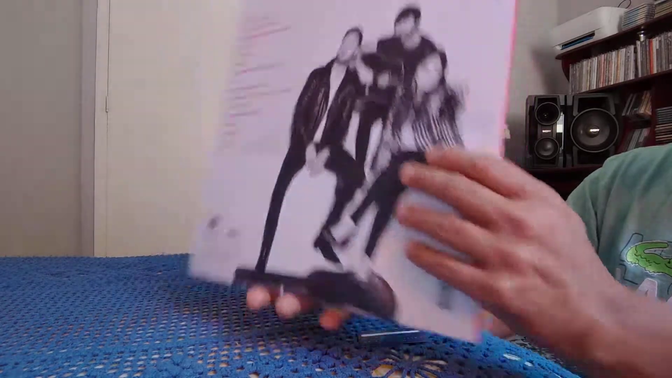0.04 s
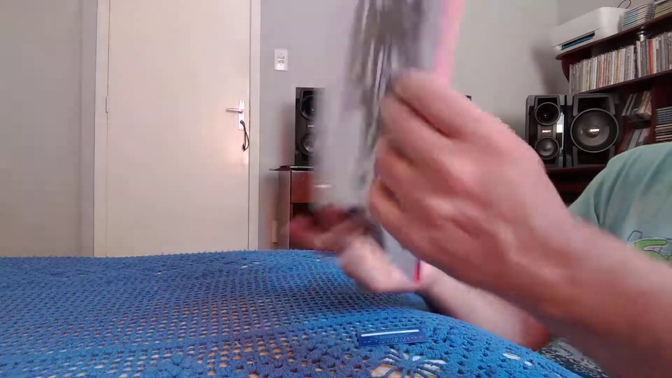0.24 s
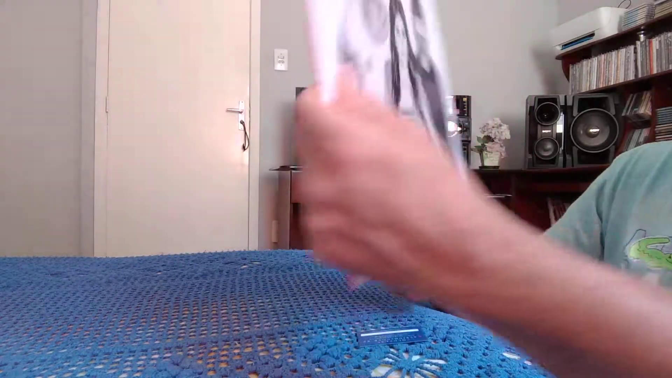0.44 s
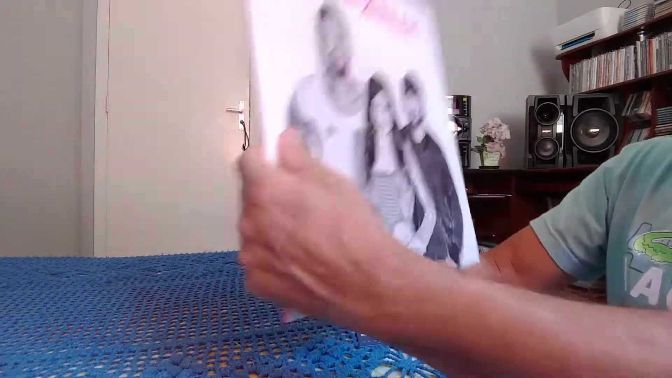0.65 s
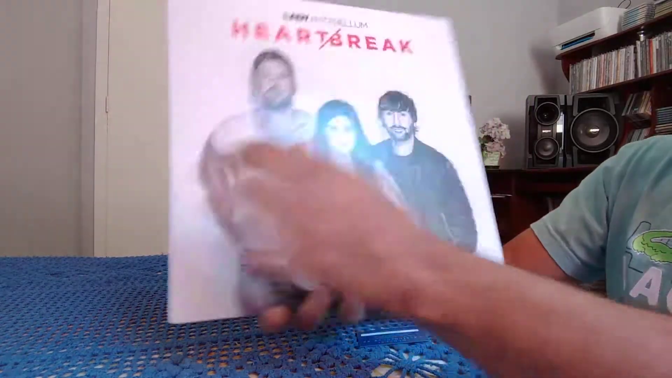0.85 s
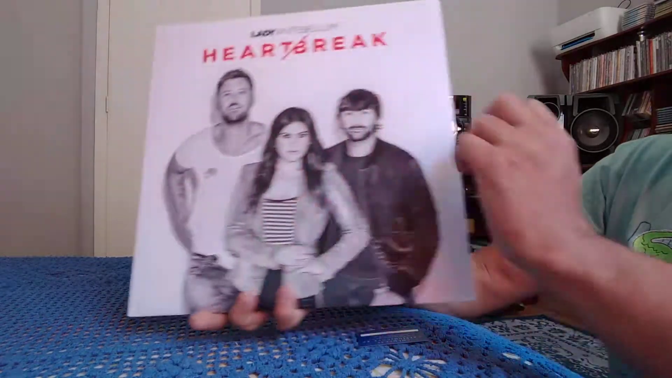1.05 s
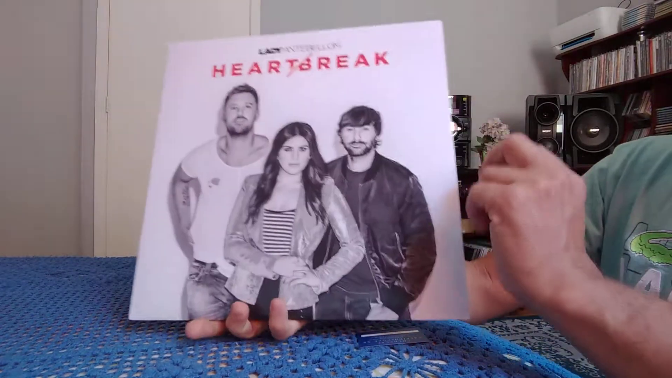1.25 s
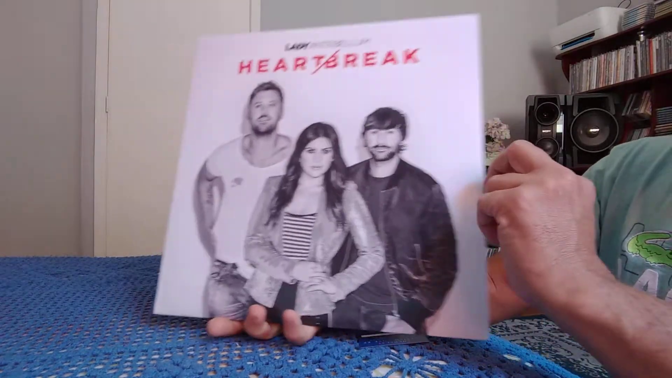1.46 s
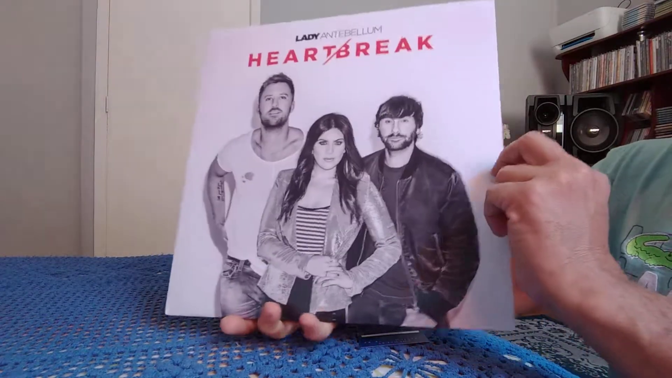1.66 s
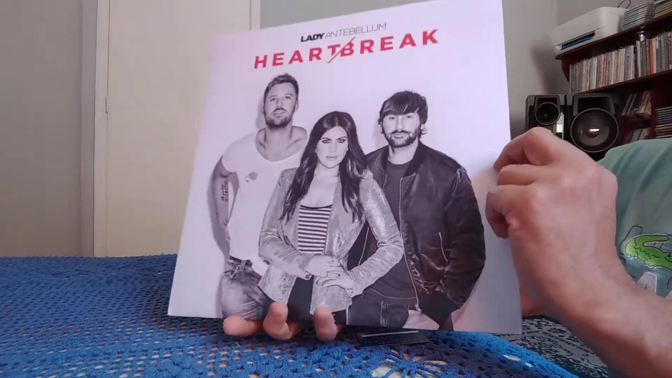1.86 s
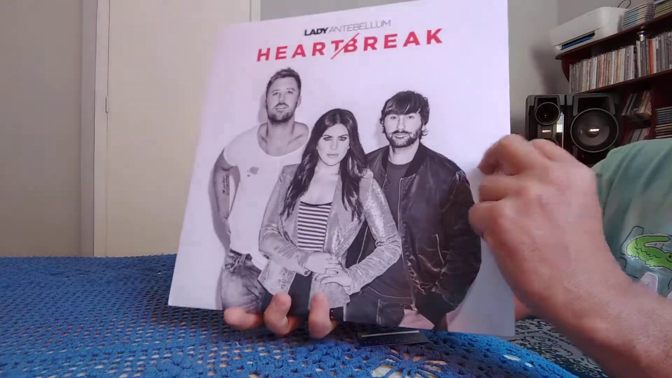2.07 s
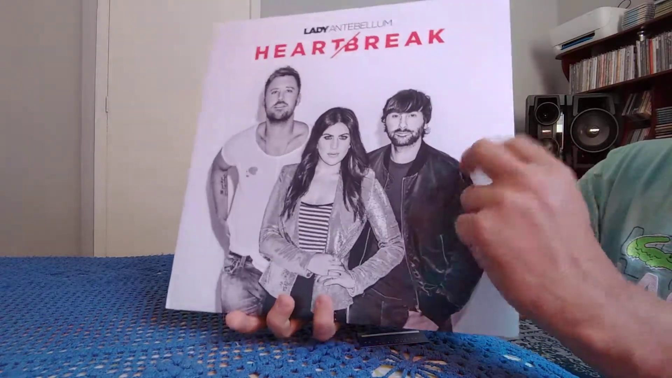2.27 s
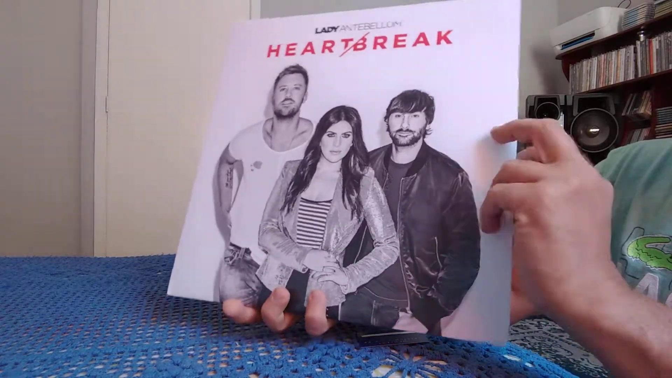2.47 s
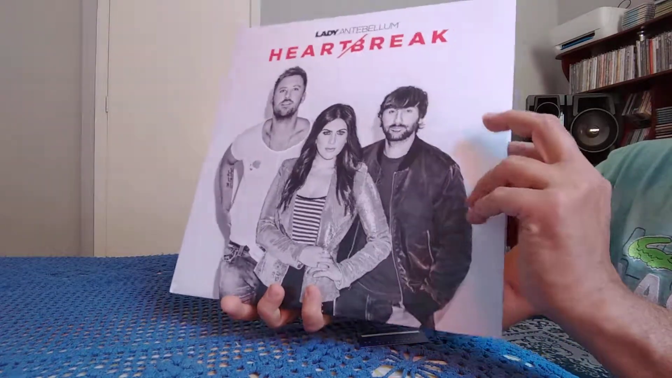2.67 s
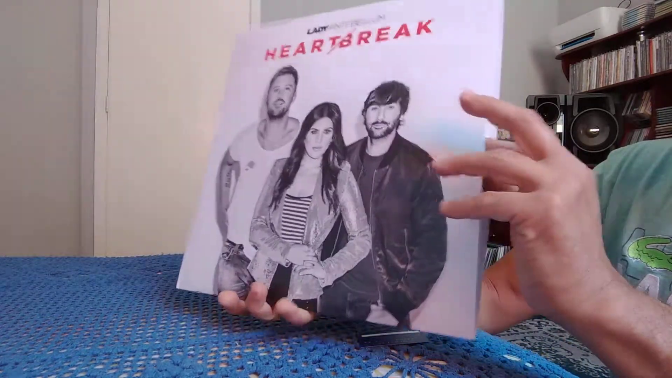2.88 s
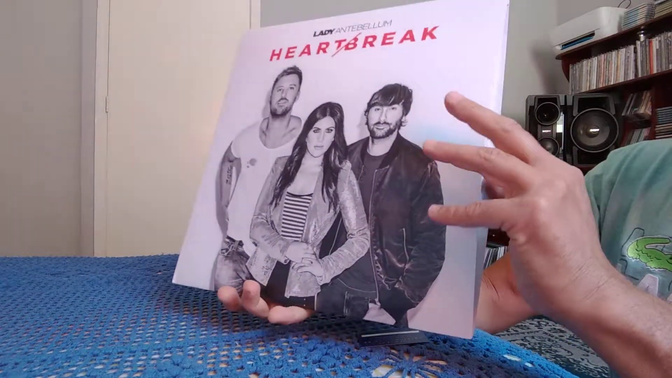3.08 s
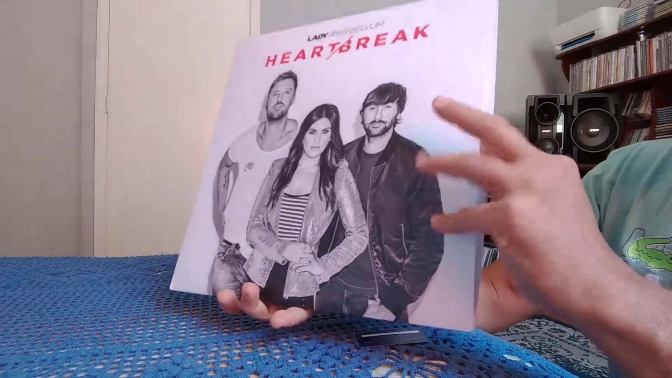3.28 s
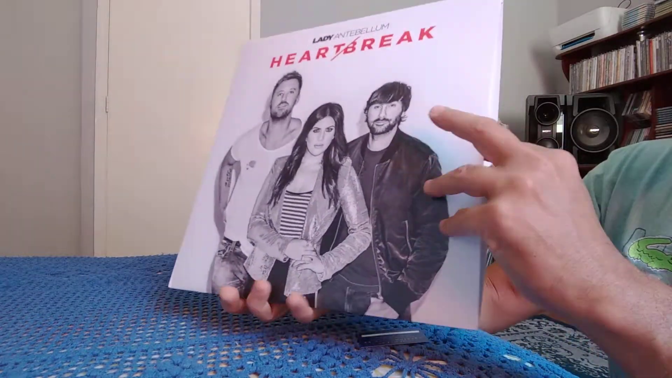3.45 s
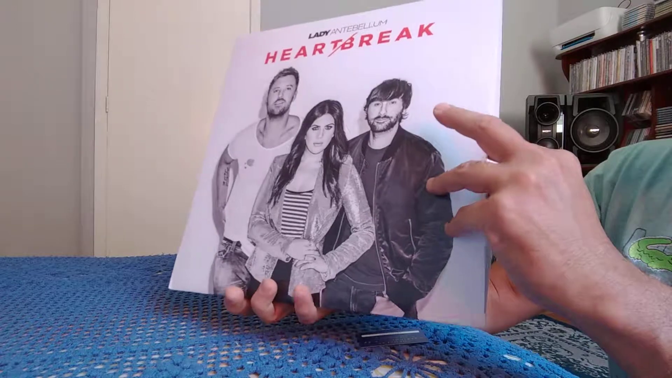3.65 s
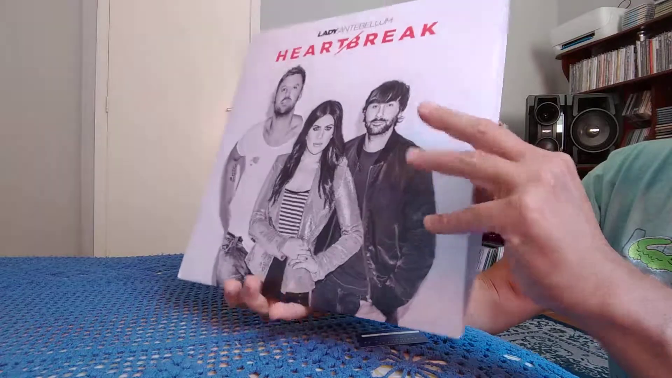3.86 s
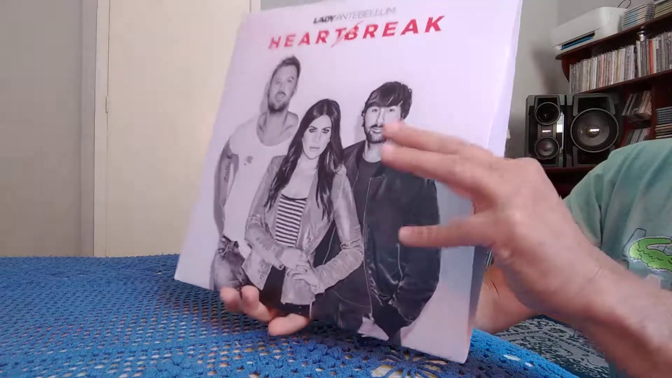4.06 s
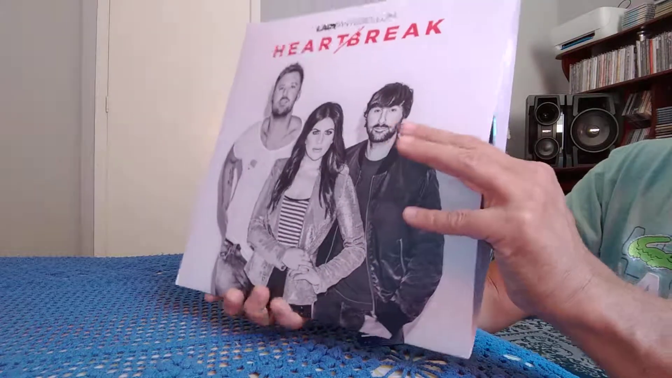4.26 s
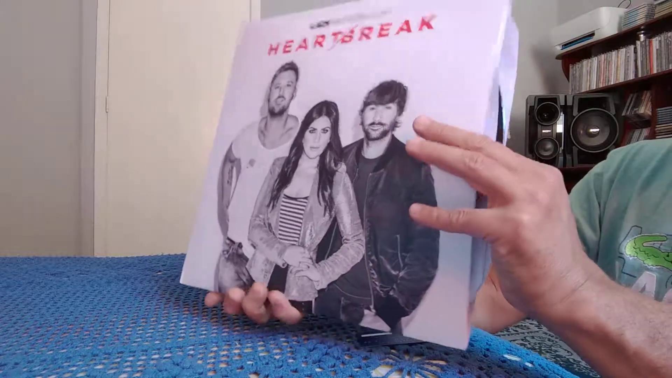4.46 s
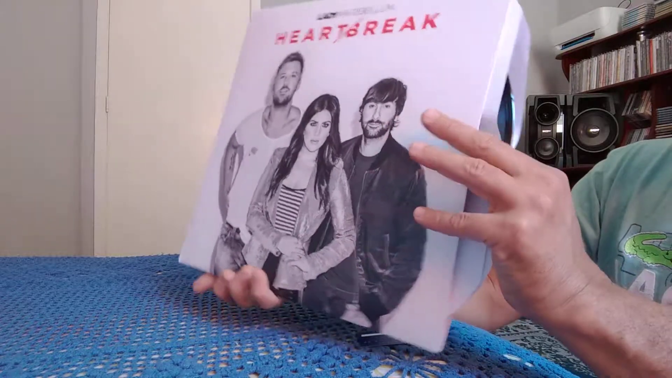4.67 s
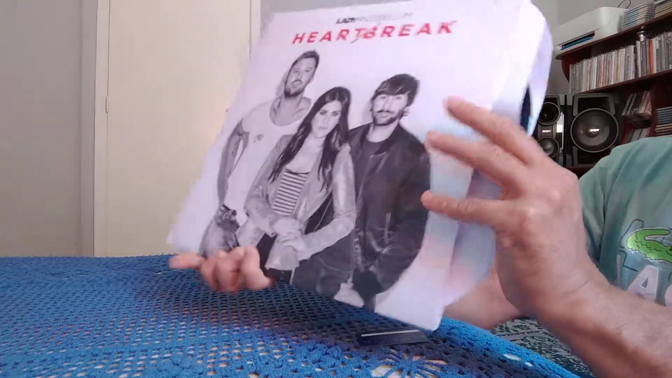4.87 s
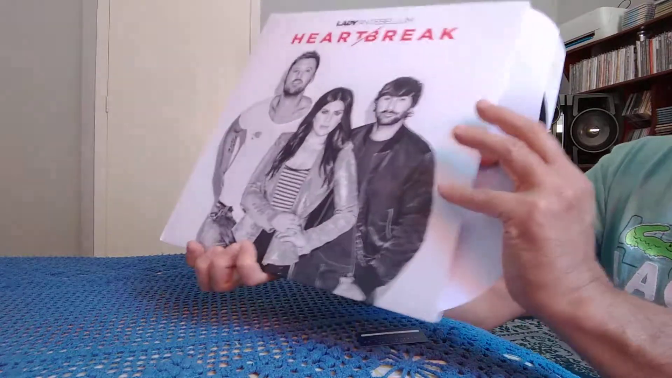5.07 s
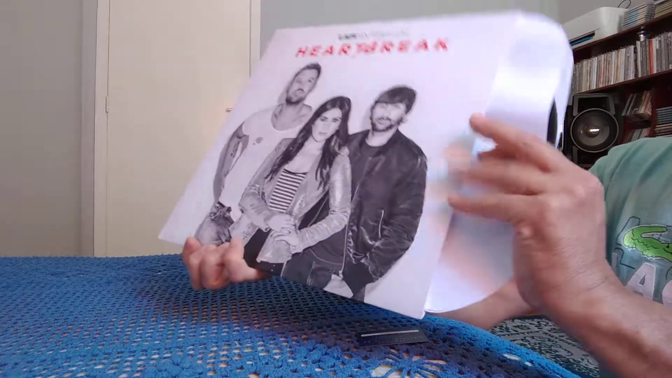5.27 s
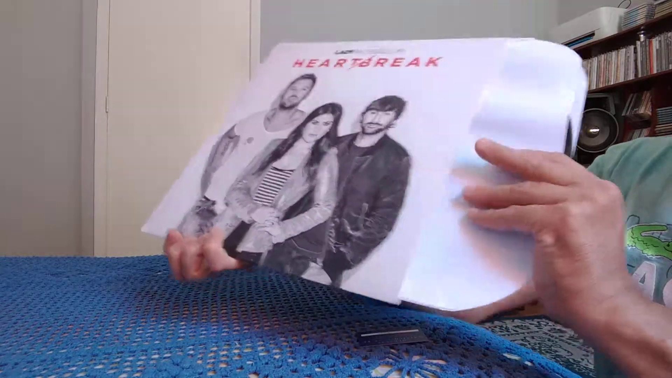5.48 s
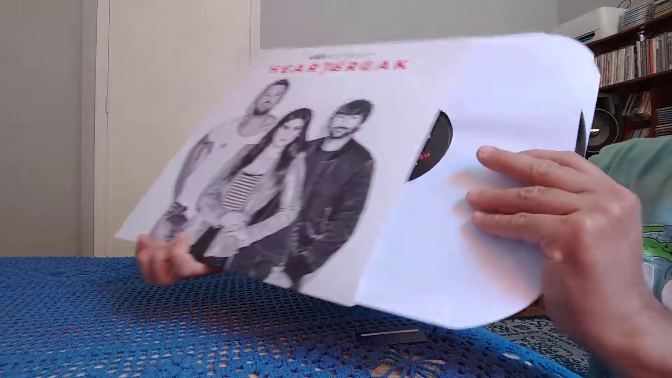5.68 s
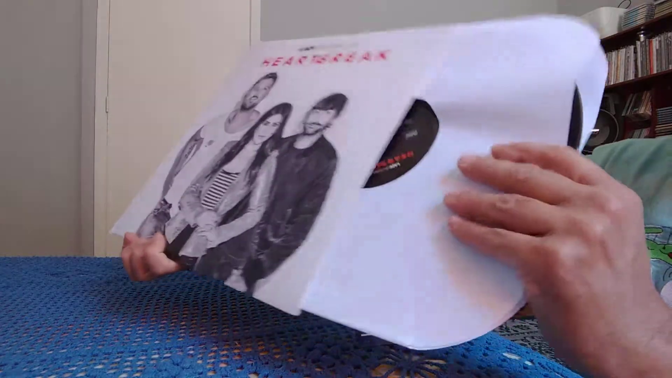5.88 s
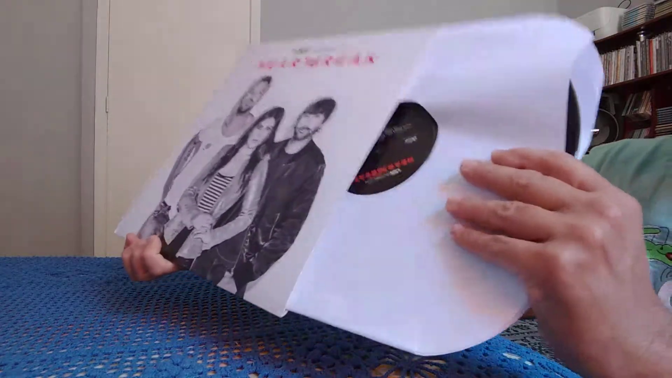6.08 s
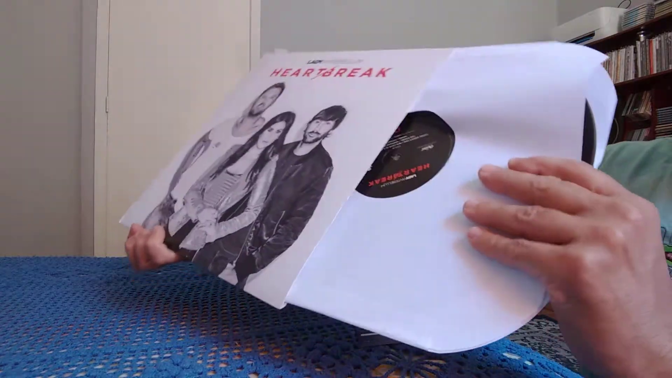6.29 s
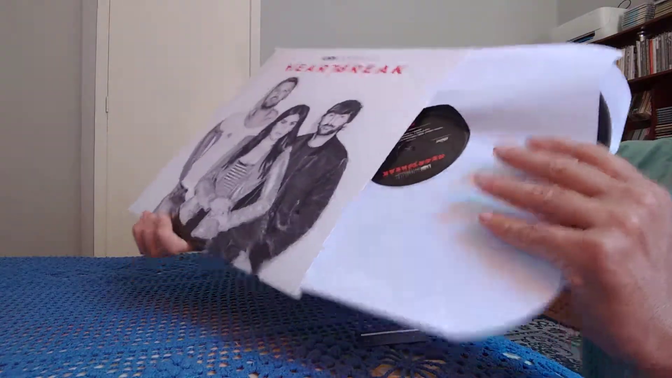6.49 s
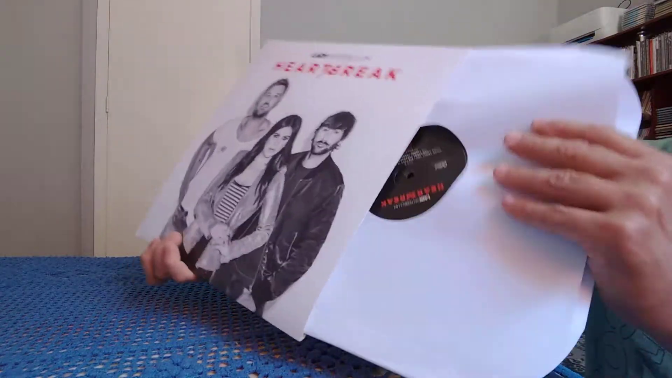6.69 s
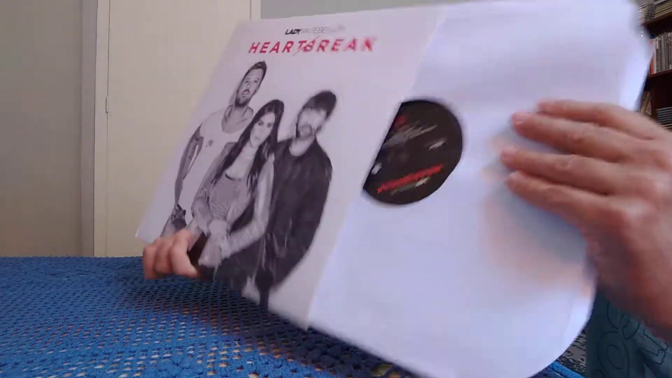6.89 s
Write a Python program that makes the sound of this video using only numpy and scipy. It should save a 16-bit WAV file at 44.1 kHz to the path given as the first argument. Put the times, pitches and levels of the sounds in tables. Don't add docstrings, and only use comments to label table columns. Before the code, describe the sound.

Close, dry handling of stiff card in a quiet room, light taps giving way to louder, sticking slides of crisp paper.

```python
import sys
import numpy as np
from scipy import signal
from scipy.fft import rfft, irfft, next_fast_len
from scipy.io import wavfile
from scipy.ndimage import uniform_filter1d

SR = 44100
rng = np.random.default_rng(int(sys.argv[2]) if len(sys.argv) > 2 else 0)


def store_wav(level_fs):
    pcm = np.round(np.clip(np.atleast_2d(level_fs), -1, 1) * 32767)
    wavfile.write(sys.argv[1], SR, pcm.T.astype(np.int16))


def field_ratio(decibels):
    return 10 ** (np.asarray(decibels, dtype=float) / 20)


N = 305613
HZ = np.fft.rfftfreq(2 * next_fast_len(N // 2 + 4096, True), 1 / SR)

# frequency_hz, level_db
AIR_COLOUR = [(30, 12.5), (50, -2), (80, -4.5), (150, 0.5), (300, -5), (700, -18), (1500, -31.5),
              (3000, -23), (5000, -22.5), (9000, -25.5), (12500, -27.5), (14500, -29)]
AIR_DB = -52
# pitch_hz, width_hz, level_db
DRONES = [
    (49.6, 11, -60),
    (148.75, 3.5, -59.5),
    (171, 2.9, -68),
]
UPPER_DRONES_DROP_S, DRONE_FADE_S = 4.5, 0.1
DRONE_STEADINESS = 0.7

# start_s, sliding_speed_db, grip_pressure_db, lean_to_left_db
HANDS = [(0, -51.5, -66, 0), (.28, -57, -61, 1), (.33, -70.5, -59.5, 0.5), (.5, -62.5, -60.5, 0.5),
         (.83, -58.5, -58.5, 0.5), (1.26, -68.5, -61.5, 1.5), (1.618, -69, -61, 1.5),
         (2.4, -70, -58.5, 0.5), (3.05, -68, -58.5, -2), (3.3, -66.5, -56.5, -1.5), (3.62, -79, -63, -1.5),
         (3.72, -60, -54.5, -1.5), (4.08, -64.5, -52.5, -1), (5.27, -77.5, -54.5, -1),
         (6.232, -49.5, -55, 0), (6.378, -78, -61.5, 0.5), (6.46, -50.5, -61, 1), (6.93, -54, -52.5, -1)]
EDGE_FROM_SPEED = 0.37
EDGE_DB, THUD_DB = -6.5, -4.5
# peak_s, fade_s, paper_db, edge_db, board_db
BRUSHES = [(.1, 0.044, -52, -60, -72), (.19, 0.086, -58, -60.5, -63), (.395, 0.025, -66, -84, -59),
           (.6, 0.14, -51, -58.5, -67), (0.689, 0.058, -46, -70, -55), (.81, 0.019, -54, -70, -70),
           (1.295, 0.02, -60, -67, -75), (1.42, 0.15, -63, -74, -63), (1.54, 0.034, -77, -67, -72),
           (1.687, 0.044, -48.5, -72, -69), (1.76, 0.055, -54, -66, -75), (1.94, 0.044, -52, -54, -71),
           (2.019, 0.093, -62, -61, -73), (2.11, 0.072, -57, -56, -66), (2.52, 0.23, -68, -62, -55.5),
           (2.826, 0.034, -66, -66, -47.5), (2.899, 0.098, -51.5, -65, -52), (3.13, 0.21, -71, -65, -73),
           (3.4, 0.066, -61, -70, -57), (3.572, 0.035, -60, -64, -52)]
BRUSH_RISE = 0.49
# peak_s, thud_db, board_db
NUDGES = [(.17, -52, -76), (.48, -49, -68), (.6, -46.5, -63), (1.42, -59, -80), (2.02, -72, -82),
          (2.09, -56, -69), (2.52, -52, -69), (3.13, -53.5, -74), (3.24, -58, -71), (3.4, -53, -64),
          (3.71, -69, -73), (3.842, -50, -53), (3.942, -47, -54), (4.05, -49, -82), (4.774, -51, -49),
          (4.99, -45, -49), (5.07, -49, -45.5), (5.25, -52, -52), (5.79, -54, -44), (6.156, -70, -61),
          (6.231, -67, -46.5), (6.34, -60, -66), (5.16, -58, -53), (6.55, -54, -50), (6.452, -49, -70),
          (6.62, -50, -46), (6.68, -47.5, -60), (6.8, -53, -52), (6.878, -55, -47.5)]
NUDGE_RISE_S, NUDGE_FADE_S = 0.036, 0.08
# peak_s, rise_s, fade_s, paper_db, edge_db
DRAWS = [(3.942, 0.067, 0.078, -45.5, -50.5), (4.138, 0.038, 0.24, -59.5, -57),
         (4.44, 0.18, 0.19, -54, -54.5), (4.56, 0.047, 1, -54, -57.5), (5.13, 0.088, 0.16, -50, -50),
         (5.341, 0.032, 0.52, -32.5, -40), (5.7, 0.24, 0.088, -66, -66), (5.884, 0.064, 0.18, -36.5, -44),
         (6.05, 0.017, 0.11, -43, -54), (6.198, 0.13, 0.082, -40.5, -45), (6.522, 0.048, 0.17, -54, -44.5),
         (6.595, 0.092, 0.052, -32.5, -55), (6.674, 0.031, 0.11, -50, -39),
         (6.72, 0.046, 0.029, -38.5, -58), (6.851, 0.022, 0.19, -32.5, -41.5),
         (6.875, .025, 0.07, -32, -60), (6.915, 0.016, .1, -29, -60)]
STOP = 0.62
# start_s, length_s, board_db, edge_db, paper_db
SLIPS = [(3.867, 0.044, -45.5, -38, -61), (3.936, 0.073, -55, -62, -49), (4.211, 0.033, -54, -49, -47.5),
         (4.288, 0.049, -56, -49.5, -51), (4.391, 0.079, -54, -45.5, -42), (4.528, 0.056, -59.5, -49, -47),
         (4.644, 0.03, -56, -45, -40.5), (4.671, .058, -51, -43.5, -35.5), (4.772, 0.037, -70, -52, -44),
         (4.918, 0.029, -51.5, -55, -38.5), (4.946, 0.025, -49.5, -48, -39.5),
         (5.008, 0.15, -56.5, -41, -33.5), (5.176, 0.038, -54.5, -50, -41.5),
         (5.283, 0.053, -60, -45.5, -36.5), (5.349, 0.03, -54, -51, -26), (5.418, 0.08, -63, -53, -28.5),
         (5.762, 0.023, -68, -44.5, -28.5), (6.433, 0.023, -71, -60, -45), (5.145, 0.026, -64, -53, -42),
         (6.482, 0.034, -67, -50, -38)]
PULL_S = 3.65

# start_s, board_db, edge_db, paper_db, t60_s
SCUFFS = [(0.099, -62, -56, -45, 0.1), (0.27, -70, -70, -47, 0.23), (0.688, -69, -68, -55, 0.072),
          (1.069, -65, -53.5, -54, 0.11), (1.673, -73, -54, -44, 0.12), (1.754, -68, -61, -49.5, 0.45),
          (1.913, -74, -58, -35, 0.094), (1.924, -59, -37.5, -28, 0.077), (2.11, -51, -41, -56, 0.041),
          (2.892, -66, -65, -34.5, 0.048), (3.141, -50.5, -53, -51, 0.14), (3.668, -43.5, -48, -50, 0.038),
          (3.728, -50.5, -60, -39, 0.14), (3.821, -44.5, -47, -50, 0.1), (3.909, -39, -41, -26, 0.079),
          (5.034, -45.5, -34.5, -28.5, 0.15), (6.481, -58, -62, -53, 0.13), (6.678, -47, -42, -49, 0.15)]
# start_s, board_knock_db, edge_crack_db, paper_tick_db, t60_s
SNAPS = [(0.38, -63, -52, -53, 0.028), (0.476, -71, -53, -57, 0.036), (1.274, -66, -60, -46, 0.008),
         (1.911, -53.5, -49, -37, 0.036), (2.012, -50, -38.5, -41, 0.019),
         (3.135, -39.5, -37.5, -67, 0.024), (3.562, -60, -61, -59, 0.013), (3.7168, -56, -52, -38.5, 0.011),
         (3.8172, -39.5, -43, -55, 0.018), (3.914, -41, -32, -40, 0.013), (4.711, -45, -48, -35, 0.0099),
         (5.754, -45, -36, -35.5, 0.0097), (6.629, -42, -32.5, -51, 0.028), (6.655, -42, -42, -53, 0.022),
         (6.666, -38.5, -46, -26, 0.027), (6.6755, -38.5, -27, -44, 0.022),
         (6.7635, -32.5, -25.5, -59, 0.0073), (1.278, -75, -75, -51, .012), (4.676, -50, -44, -50, 0.018),
         (3.65, -55.5, -55.5, -64, 0.03), (6.779, -45, -52, -58, 0.014), (6.687, -43, -44, -54, 0.016),
         (5.176, -42.5, -52, -54, 0.011), (5.7755, -54, -48, -39, .007), (5.785, -49, -46, -42, 0.0072),
         (5.809, -54, -33, -47, .01), (6.225, -47.5, -48, -52, 0.015), (6.608, -41, -48, -55, 0.021),
         (6.702, -51, -52, -52, 0.014), (3.8745, -43, -43, -53, 0.0095), (2.117, -47, -49, -58, .012),
         (6.122, -46, -53, -52, 0.0093)]
# start_s, length_s, pitch_hz, level_db
SQUEAKS = [
    (1.482, 0.22, 3060, -68),
    (2.376, 0.54, 3150, -72),
]
SQUEAK_WIDTH_HZ = 63
# start_s, peak_db, pitch_hz, t60_s
RINGS = [(2.615, -33, 1195, 0.039), (3.136, -23.5, 860, 0.03), (3.1354, -30, 440, 0.03),
         (3.136, -26, 1193, 0.026), (3.1362, -28, 1000, 0.038), (3.138, -34, 210, 0.052),
         (3.199, -32, 97, 0.13), (3.136, -24, 1680, 0.032), (3.818, -23.5, 735, 0.018),
         (4.294, -37.5, 870, 0.1), (4.712, -17.5, 1435, 0.015), (4.772, -34, 495, 0.055),
         (5.057, -28, 1580, 0.047), (5.755, -30, 102, 0.21), (6.225, -30.5, 1190, 0.033),
         (6.514, -36, 897, 0.066), (6.673, -23, 1640, 0.022)]

# frequency_hz, level_db
SKIN_COLOUR = [(1500, -14), (3500, -11), (5500, -14.5), (8000, -9.5), (10000, -5), (12500, 0),
               (14000, -1.5)]
# frequency_hz, level_db
PAPER_COLOUR = [(1500, -26), (3500, -12.5), (5500, -8), (8000, -4.5), (10000, -3.5), (12500, 0.5),
                (14000, -2.5)]
# frequency_hz, level_db
EDGE_COLOUR = [(700, -27), (1500, -8.5), (2600, 3), (3500, -6), (5500, -7.5), (8000, -20.5), (12000, -7.5)]
# frequency_hz, level_db
RUB_COLOUR = [(100, -34.5), (250, 1.5), (600, -2.5), (900, -1.5), (1350, -1), (2000, -5.5), (3500, -22.5)]
# frequency_hz, level_db
DRAG_COLOUR = [(100, -22), (250, -13), (600, -7), (900, -5.5), (1350, 0), (2000, -5.5), (3500, -24.5)]
# frequency_hz, level_db
PALM_COLOUR = [(100, -17), (250, 0.5), (450, 2), (900, -8), (1350, -14), (2000, -1.5), (3500, -15)]
# frequency_hz, level_db
THUD_COLOUR = [(30, -56), (50, 0.5), (100, 7.5), (170, 7.5), (300, -6.5), (600, -21.5)]
# frequency_hz, level_db
KNOCK_COLOUR = [(80, -7), (200, 2.5), (500, -4), (900, -8), (1500, -4.5), (2200, 2.5), (4000, -34)]

# frequency_hz, level_db
SHADE = [(300, -0.5), (1500, -3.5), (4000, -6), (8000, -8.5), (13000, -10)]
# frequency_hz, share (0 to 1)
ALIKE = [(60, 0.77), (300, 0.88), (700, 0.34), (1500, 0.17), (4000, 0.4), (12000, 0)]
# frequency_hz, t60_s
ROOM = [(200, 0.054), (1500, 0.078), (5000, 0.31), (13000, 0.018)]
# frequency_hz, level_db
CROSS = [(60, -4), (400, -1), (1100, -1), (2300, -2.5), (3000, -5), (3800, -7), (4400, -4.5), (5000, -4.5),
         (5700, -9), (7100, -7), (13000, -9)]
CROSS_S, CROSS_LAG_HZ = 0.00039, 3050
# frequency_hz, drift_radians
WANDER = [(300, .03), (2300, .1), (4600, .35), (7000, .8), (13000, 1.3)]
# frequency_hz, threshold_db
HOLE = [(1100, -15), (1900, -11), (2100, -4.5), (2400, -4), (2650, -9), (3500, -10), (4300, -3),
        (4900, -2.5), (5400, -7), (5900, -9), (7100, -5.5), (8000, -9), (12000, -11)]
# time_s, threshold_shift_db
HOLLOW = [(0, -1), (.25, 6), (.33, -4.5), (.45, -3), (.54, 1.5), (.74, 0), (.85, -13), (1.25, -9),
          (1.33, 1), (1.6, -2), (1.75, 2), (2, 1.5), (2.3, 0), (2.62, 0.5), (2.8, -2), (2.92, 0),
          (3.11, -7), (3.22, 1.5), (3.42, 3), (3.55, 0), (3.7, -5), (3.8, 0), (3.9, -7), (4, 3), (4.1, -9),
          (4.3, 1), (4.6, 3), (4.7, -3), (4.85, 0), (5, -5), (5.1, 1), (5.2, 4.5), (5.43, -2), (5.5, -6.5),
          (5.7, -4), (5.82, -2), (5.88, 1.5), (6.1, 2), (6.16, -4), (6.4, -1), (6.5, -4), (6.6, -4),
          (6.7, -6.5), (6.93, -6)]
ONSET_DB = 5
EDGE_HZ = 14270


def evened(x):
    return x / np.sqrt(np.mean(x ** 2) + 1e-20)


def smoothed(x, first_size, first_axis, second_size, second_axis):
    x = uniform_filter1d(x, size=first_size, axis=first_axis)
    return evened(uniform_filter1d(x, size=second_size, axis=second_axis))


def read(points, hz):
    f, value = np.transpose(points)
    return np.interp(np.log(hz + 1), np.log(f + 1), value)


def shaped(x, response):
    size = 2 * (len(HZ) - 1)
    return irfft(rfft(x, size) * response, size)[..., :N]


def causal(points):
    log_gain = np.log(field_ratio(read(points, np.fft.rfftfreq(8192, 1 / SR))))
    full = np.concatenate([log_gain, log_gain[-2:0:-1]])
    taps = np.fft.ifft(np.exp(np.conj(signal.hilbert(full)))).real[:2048]
    return taps / np.linalg.norm(taps)


def coloured(x, points):
    return signal.oaconvolve(x, causal(points)[None], axes=1)[:, :min(N, x.shape[1])]


def changed(x, before, after):
    at = round(PULL_S * SR)
    return np.concatenate([coloured(x[:, :at], before), coloured(x[:, at:], after)], axis=1)


def flicker(seconds):
    size = max(int(seconds * SR), 2)
    x = uniform_filter1d(rng.standard_normal(N), size, mode="wrap")
    return evened(uniform_filter1d(x, size, mode="wrap"))


def ports(common, own, shade=1):
    share = np.clip(read(ALIKE, HZ), 0, 1)
    weights = np.array([share, np.sqrt(1 - share ** 2)])
    left = shaped(np.array([common, own]), shade * weights).sum(0)
    return np.array([left, common])


def hush():
    air = evened(coloured(rng.standard_normal((2, N)), AIR_COLOUR))
    air = air * field_ratio(AIR_DB + 0.55 * flicker(0.078))
    running = np.clip((UPPER_DRONES_DROP_S - np.arange(N) / SR) / DRONE_FADE_S, 0.4, 1)
    for hz, width_hz, db in DRONES:
        drone = shaped(rng.standard_normal((2, N)), 1 / (1 + ((HZ - hz) / width_hz) ** 4))
        power = uniform_filter1d(drone ** 2, size=4000).clip(1e-14)
        drone = drone / power ** (DRONE_STEADINESS / 2)
        air = air + field_ratio(db) * evened(drone) * (running if hz > 100 else 1)
    return ports(*air)


def swells(t, peak_s, rise_s, fade_s, *parts_db):
    late = t - peak_s[:, None]
    far = np.maximum(late / fade_s[:, None], -late / rise_s[:, None])
    shape = field_ratio(-20 * np.minimum(far + STOP * far ** 4, 20))
    return field_ratio(2 * np.array(parts_db)) @ shape


def motion():
    t = np.arange(0, N / SR + 0.002, 0.002)
    s, *controls = np.transpose(HANDS)
    speed_db, grip_db, lean_db = (np.interp(t, s, c) for c in controls)
    edge_db = EDGE_DB + EDGE_FROM_SPEED * speed_db + (1 - EDGE_FROM_SPEED) * grip_db
    power = field_ratio(2 * np.array([speed_db, edge_db, grip_db, grip_db - 99, grip_db + THUD_DB]))
    s, fade_s, *parts_db = np.transpose(BRUSHES)
    power[:3] += swells(t, s, BRUSH_RISE * fade_s, fade_s, *parts_db)
    power[:2] += swells(t, *np.transpose(DRAWS))
    s, thud_db, board_db = np.transpose(NUDGES)
    rise_s, fade_s = np.full(len(s), NUDGE_RISE_S), np.full(len(s), NUDGE_FADE_S)
    power[3:] += swells(t, s, rise_s, fade_s, board_db, thud_db)
    return [np.interp(np.arange(N) / SR, t, v) for v in (*np.sqrt(power), lean_db)]


def grains(per_s, spread_db):
    size_db = spread_db * np.minimum(rng.exponential(1, (2, N)), 3.5)
    size = field_ratio(size_db) * rng.standard_normal((2, N))
    return evened(size * (rng.random((2, N)) < per_s / SR))


def patchy(x, patchy_db):
    z = signal.stft(x, nperseg=256)[2]
    field = smoothed(rng.standard_normal(z.shape[1:]), 6, 0, 14, 1)
    return evened(signal.istft(z * field_ratio(patchy_db * field), nperseg=256)[1][:, :N])


def sliding():
    fizzing, scraping, rubbing, flexing, thudding, lean_db = motion()
    jerk, chatter = flicker(0.019), flicker(0.0046)
    board, edge, paper = slips()

    fizz = patchy(changed(grains(17000, 0.48), SKIN_COLOUR, PAPER_COLOUR), patchy_db=1.5)
    scrape = patchy(coloured(grains(9000, 1.9), EDGE_COLOUR), patchy_db=0.5)
    bumps = grains(3000, 1.4)
    rub = patchy(changed(bumps, RUB_COLOUR, DRAG_COLOUR), patchy_db=0.5)
    flex = coloured(bumps[::-1], PALM_COLOUR)
    thud = coloured(grains(600, 2.7), THUD_COLOUR)

    mix = fizz * np.hypot(fizzing * field_ratio(6.0), paper) * field_ratio(0.62 * jerk + 0.21 * chatter)
    mix += scrape * np.hypot(scraping * field_ratio(5.0), edge) * field_ratio(0.48 * jerk + 0.15 * chatter)
    mix += rub * np.hypot(rubbing * field_ratio(-5.5), board) * field_ratio(1.02 * jerk + 0.99 * chatter)
    mix += flex * flexing * field_ratio(-4.0 + 1.3 * jerk)
    mix += thud * thudding * field_ratio(-0.5)
    return mix * field_ratio([-lean_db, lean_db])


def bursts(events, rise_s, colours, click):
    t, out = np.arange(6000) / SR, np.zeros((3, 2, N + 6000))
    noise = rng.standard_normal((len(events), 3, 2, len(t)))
    rise = 1 - np.exp(-t / np.array(rise_s)[:, None])
    for (s, *parts_db, t60), burst in zip(events, noise):
        ring_s = max(t60, 0.002) * np.array([2.5, 1.1, 0.6])[:, None]
        level = field_ratio(np.array(parts_db)[:, None] - 60 * t / ring_s)
        at = round(s * SR)
        out[:, :, at:at + len(t)] += burst * (level * rise)[:, None]
        out[:, :, at + 12] += click * level[:, :1] * [[1], [0.55], [1]]
    return sum(coloured(o, c) for o, c in zip(out, colours))


def scuffs():
    colours = (RUB_COLOUR, EDGE_COLOUR, PAPER_COLOUR)
    return field_ratio(1.0) * bursts(SCUFFS, (0.004, 0.003, 0.002), colours, click=0)


def snaps():
    colours = (KNOCK_COLOUR, EDGE_COLOUR, PAPER_COLOUR)
    return field_ratio(6.5) * bursts(SNAPS, (0.0008, 0.0003, 0.0001), colours, click=4.27)


def squeaks():
    t, out = np.arange(N) / SR, np.zeros(N)
    for s, length_s, hz, db in SQUEAKS:
        resonance = 1 / (1 + ((HZ - hz) / SQUEAK_WIDTH_HZ) ** 2)
        whistle = evened(shaped(rng.standard_normal(N), resonance))
        out += field_ratio(db) * whistle * np.sin(np.pi * np.clip((t - s) / length_s, 0, 1))
    return out


def rings():
    t, out = np.arange(6000) / SR, np.zeros(N + 6000)
    rise = 1 - np.exp(-t / 0.00022)
    for s, peak_db, hz, t60 in RINGS:
        at = round(s * SR)
        decay = field_ratio(peak_db - 60 * t / max(t60, 0.01))
        out[at:at + len(t)] += decay * rise * np.sin(2 * np.pi * hz * t)
    return out[:N] * field_ratio(-11.5)


def slips():
    t, level = np.arange(12000) / SR, np.zeros((3, N))
    for s, length_s, *parts_db in SLIPS:
        at = round(s * SR)
        gate = np.clip(t / 0.012, 0, 1) * np.exp(-np.maximum(t - length_s, 0) / 0.0075)
        level[:, at:at + len(t)] += field_ratio(np.array(parts_db))[:, None] * gate
    return level


def room(x):
    hz, t, z = signal.stft(rng.standard_normal((2, SR // 2)), SR, nperseg=256)
    tail = signal.istft(z * field_ratio(-60 * t / read(ROOM, hz)[:, None]), SR, nperseg=256)[1]
    tail = np.pad(tail, ((0, 0), (200, 0)))
    return signal.fftconvolve(x, tail / np.linalg.norm(tail[0]), axes=1)[:, :N]


def scene():
    handling = sliding() + snaps() + scuffs() + rings() + squeaks()
    near = ports(*handling, shade=field_ratio(read(SHADE, HZ)))
    return near + field_ratio(-12.5) * room(near) + hush()


def kept_bands(pair, hz, t, edges):
    power = np.add.reduceat(uniform_filter1d(abs(pair) ** 2, size=3, axis=2), edges, axis=1)
    band_hz = hz[edges]
    mood_db = 2.8 * smoothed(rng.standard_normal(power.shape), 2, 1, 3, 2)
    mood_db -= 2.5 * np.outer(band_hz > 6000, t > 4.95)
    shift_db = np.interp(t, *np.transpose(HOLLOW))
    mood_db += 0.9 * shift_db * (abs(band_hz - 4800) < 1000)[:, None]
    kept = power > power[::-1] * field_ratio(2 * (read(HOLE, band_hz)[:, None] + mood_db))
    total = power[:, 20:].sum((0, 1))
    return kept | (total > field_ratio(2 * ONSET_DB) * np.roll(total, 2))


def widen(dry):
    hz, t, z = signal.stft(dry, SR, nperseg=1024)
    drift = smoothed(rng.standard_normal(z.shape), 9, 1, 5, 2)
    lag = 2 * np.pi * hz * CROSS_S + np.arctan(hz / CROSS_LAG_HZ)
    phase = lag[:, None] + read(WANDER, hz)[:, None] * drift
    cross = field_ratio(read(CROSS, hz)[:, None]) * np.exp(-1j * phase)
    left, right = z - cross * z[::-1]
    pair = np.array([left + right, left - right]) / 2
    edges = np.unique(np.round(np.geomspace(40, 553, 46)) - 40).astype(int)[:-1]
    kept = kept_bands(pair, hz, t, edges)
    mid, side = pair * np.repeat(kept, np.diff(edges, append=len(hz)), axis=1)
    return signal.istft(np.array([mid + side, mid - side]), SR, nperseg=1024)[1][:, :N]


def overshoot(x):
    band = 1 / (1 + (EDGE_HZ / (HZ + 1)) ** 400) / (1 + (HZ / 15000) ** 30)
    top = shaped(x, band)
    power = (top ** 2).mean(0)
    brief = uniform_filter1d(power, size=150)
    crest = brief / (uniform_filter1d(power, size=4000) + 1e-16)
    gain = np.minimum(field_ratio(-10.0), field_ratio(-74.0) / np.sqrt(abs(brief) + 1e-16))
    gate = np.clip((crest - 4.5) / 3.0, 0, 1) * (np.arange(N) < N - 2000)
    return gain * top * gate


def roll_off(x):
    return signal.sosfilt(signal.butter(12, 15450, fs=SR, output="sos"), x)


def record(dry):
    wide = widen(dry)
    band = 1 / (1 + (HZ / EDGE_HZ) ** 400) / (1 + (46 / (HZ + 1)) ** 10)
    mix = shaped(wide, band) + overshoot(wide)
    return roll_off(mix)


dry = scene()
out = record(dry)
store_wav(out)
```